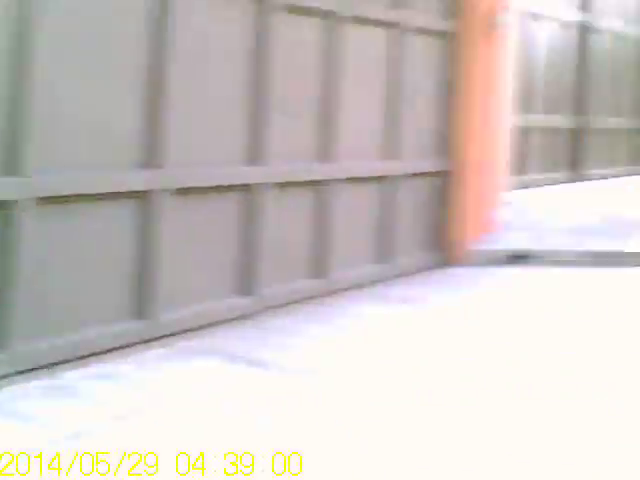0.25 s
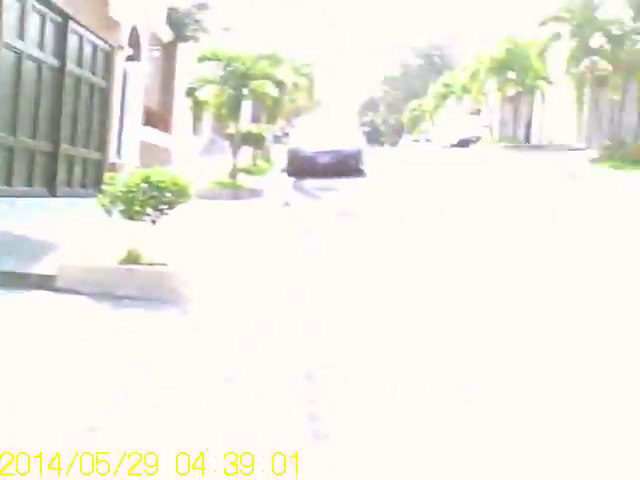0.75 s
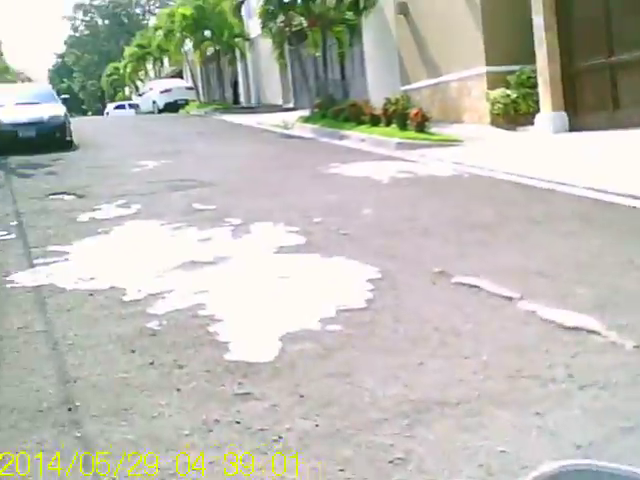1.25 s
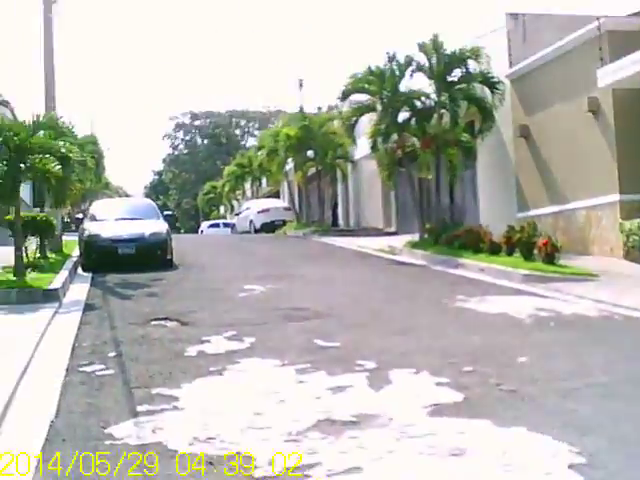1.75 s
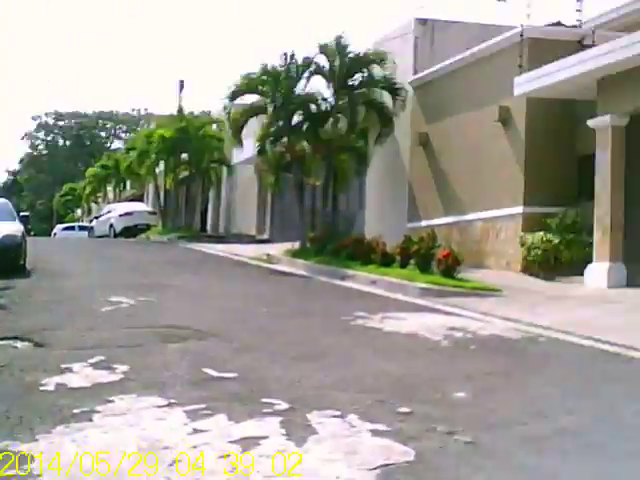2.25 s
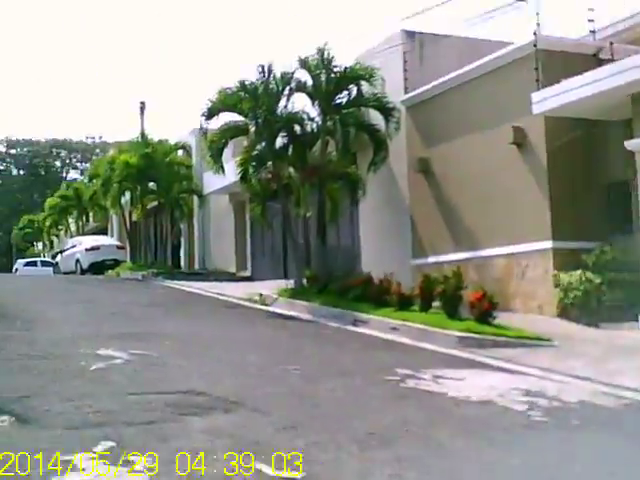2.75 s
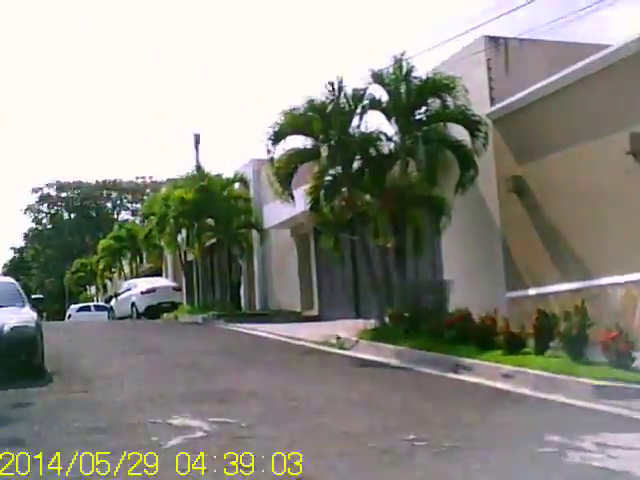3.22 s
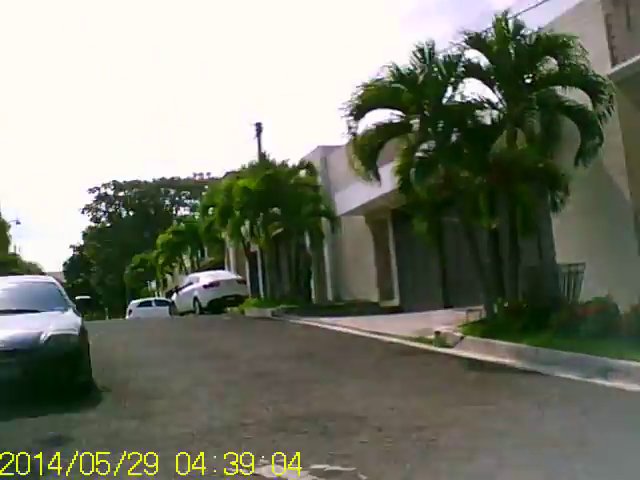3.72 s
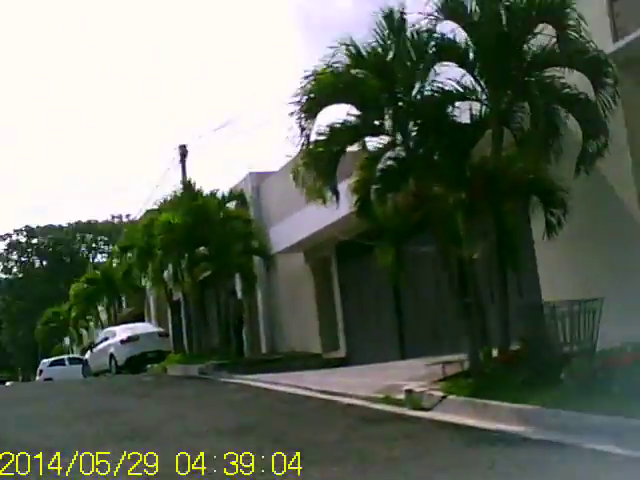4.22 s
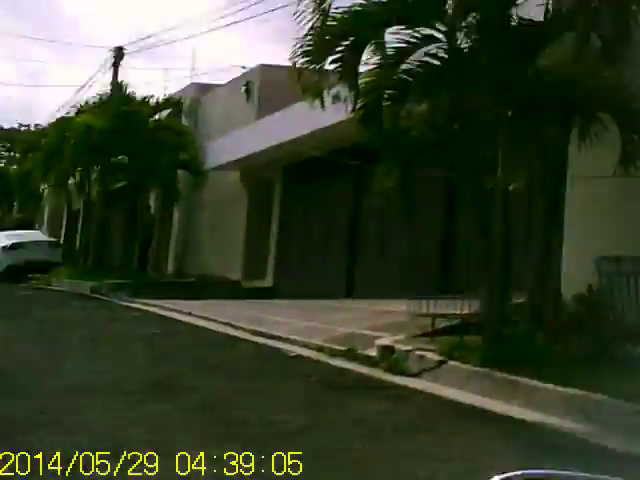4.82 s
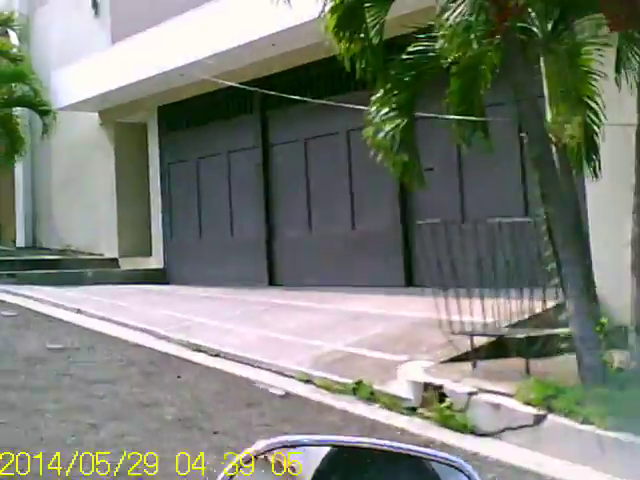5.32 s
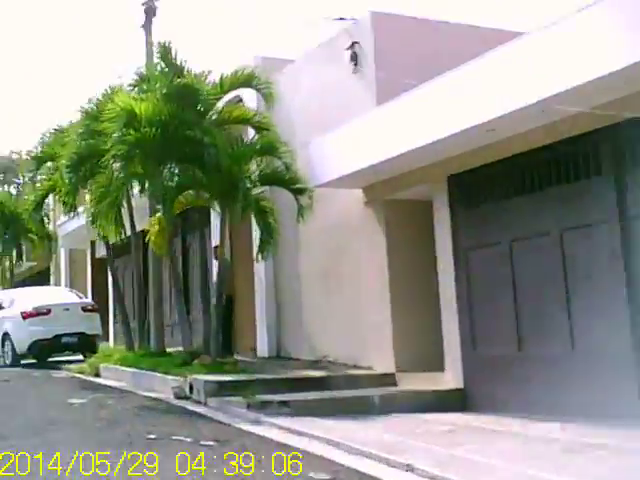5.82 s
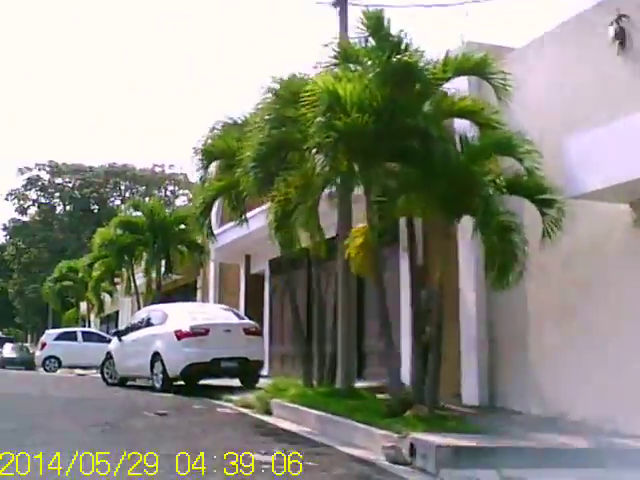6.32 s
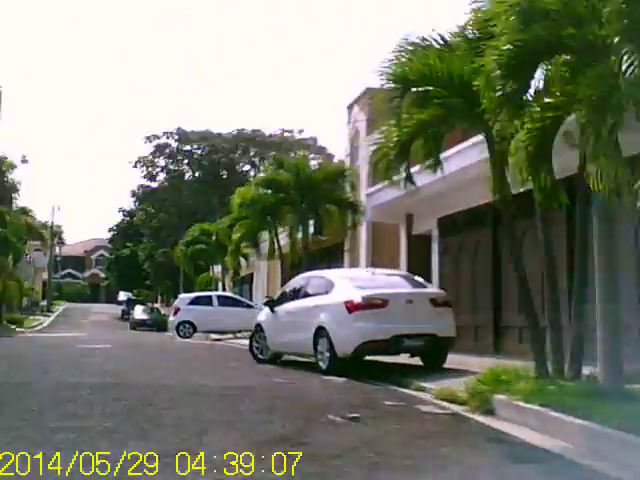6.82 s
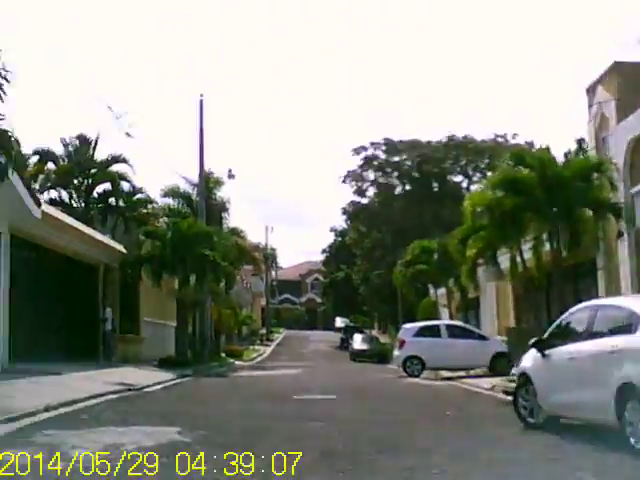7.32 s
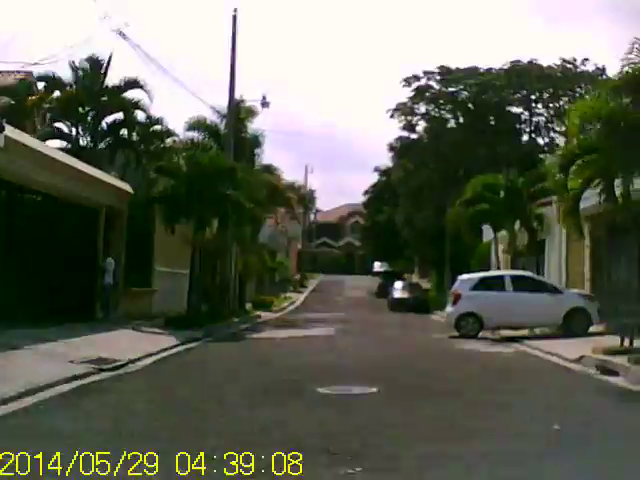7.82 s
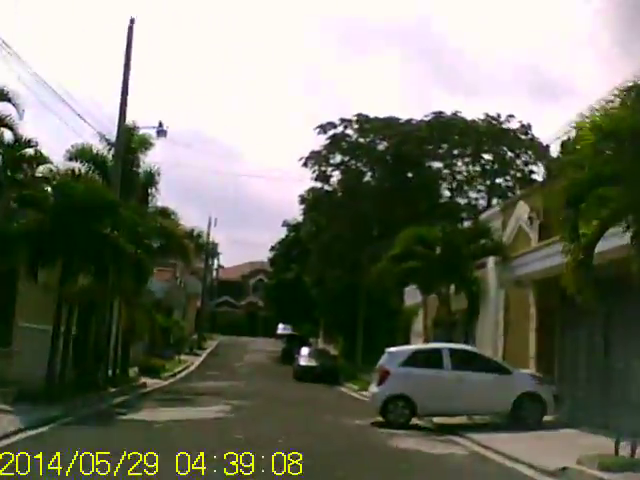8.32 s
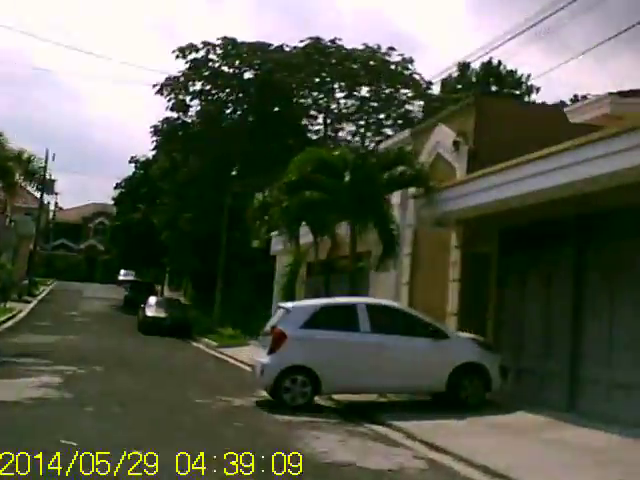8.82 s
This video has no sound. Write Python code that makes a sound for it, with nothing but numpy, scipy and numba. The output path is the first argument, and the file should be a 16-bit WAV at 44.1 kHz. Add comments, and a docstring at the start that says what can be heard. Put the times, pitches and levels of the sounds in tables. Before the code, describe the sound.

A big V-twin motorcycle heard from the saddle blips its throttle twice, sinks near idle, then pulls steadily up a street with a deep uneven throb.

```python
"""A big V-twin motorcycle from the saddle: two swells of throttle, a drop almost to idle, a long pull up a street.
Throughout, two cylinders fire in a limping pair and ring the exhaust modes; noise rasps behind each beat,
the engine knocks and ticks every cycle, and hiss and faint buffeting grow with the revs.
Loose metal chinks at the very start, fading within the first second; the rear pipe snarls on both swells;
a thin ring marks low revs. On the climb the firing stumbles, the drive snatches, and trim buzzes in short spells."""
import sys
import numpy as np
from scipy import signal
from scipy.fft import rfft, irfft, next_fast_len
from scipy.io import wavfile
from scipy.ndimage import uniform_filter1d
from numba import njit

SR = 44100
rng = np.random.default_rng(int(sys.argv[2]) if len(sys.argv) > 2 else 0)


def file_out(sig):
    """Save sig as 16-bit WAV at sys.argv[1]."""
    # one column per channel
    cols = np.atleast_2d(sig).T
    # limit, then scale
    lim = np.clip(cols, -1, 1)
    pcm = np.round(lim * 32767).astype(np.int16)
    wavfile.write(sys.argv[1], SR, pcm)


N = 399546
TIME_S = np.arange(N) / SR
CRUISE_HZ = 20  # reference speed, four-stroke cycles per second

# Engine speed. Each row: time in seconds, four-stroke cycles per second.
REVS = [(0.0, 22.18), (0.196, 24.55), (0.396, 20.49), (0.703, 24.66), (1.172, 14.94), (1.627, 10.41),
        (2.299, 11.45), (2.433, 12.17), (3.998, 15.605), (6.1, 19.27), (6.5, 19.9), (6.8, 20.745),
        (7.2, 21.877), (7.8, 23.8), (8.5, 26.285), (9.06, 27.83)]
# Drive snatch, crank ahead or behind. Each row: time in seconds, lead in cycles.
SNATCH = [(2.6, 0), (3.25, .013), (3.46, -.02), (3.56, .006), (3.86, .012), (3.98, -.018), (4.13, .02),
          (4.3, .021), (4.42, -.001), (4.74, .03), (5.3, -.004), (5.6, .015), (5.85, 0), (6.2, -.004),
          (6.45, .013), (6.75, 0)]
# Engine pull. Each row: time in seconds, load in dB around the usual for its speed.
LOAD = [(0, 1.5), (.2, -1.5), (.45, 1), (.7, -2.5), (1.08, 1.5), (1.65, 1), (2.25, 1), (2.5, 2.5), (3.2, 2),
        (3.48, 0), (3.55, 3), (3.72, 1.3), (4.05, 0), (4.35, -1.2), (4.95, 0), (5.8, -0.4), (6.3, -1),
        (6.95, 0.5), (7.72, 0.3), (7.95, 0), (8.22, 0.7), (8.55, -2.3), (9.06, -2)]
# Front cylinder's firing against the rear. Each row: time in seconds, difference in dB.
FRONT_LEAN = [(.6, 1.5), (1.3, 0.5), (2.2, -2), (3.4, 2), (3.6, 2.5), (5.5, -3.7), (6.8, -2.5), (7.5, -.5),
              (7.8, 4), (8.2, -1.5), (8.6, 2)]

# Exhaust modes, from deep to high. Each row: centre in Hz, width in Hz, relative level in dB,
# growth in dB per doubling of the revs; all as at CRUISE_HZ.
DEEP_MODES = [(108.54, 13.6, 0, 7), (126.2, 14.4, 3.5, 10), (164, 6.6, -26.5, 10), (192.4, 12.4, -11, 0)]
MIDDLE_MODES = [(235.6, 30, -3.5, 1.5), (262, 12.9, 1, 0.5), (299.2, 28, 5, 0)]
GROWL_MODES = [(362.2, 19.4, 9, -4)]
SNARL_MODES = [(448, 49, -3, -3), (479, 47, 2, 1), (527, 22, -4, 0)]
BLARE_MODES = [(488, 39, -3.5, 4), (582.4, 19, -10, -5.5), (612.8, 19.7, -10, 28), (692, 33, -13, -4.5),
               (847, 28, -10, 14.5), (1180, 48, -4, -3)]
# Gain trims of single exhaust harmonics, shaping the note. Each row: multiple of the cycle rate (rounded for pitch),
# gain in dB at CRUISE_HZ, growth in dB per doubling of the revs.
HARMONIC_TRIMS = [(2, -0.5, 8.5), (3, -3, -3.5), (4, 1.5, -3), (6, 2, 7), (7, 0, 1.7), (8, -8.5, 1.5),
                  (9, 1, 4), (10, -1, -6), (11, 3, -0.5), (12, -0.2, -4), (13.1, 4, -8), (14, -1.5, 8.1),
                  (15, 1.5, -9), (16, 1, 4.5), (20, 2.5, 1.5), (21, -2.5, 6), (22, -3.5, 2), (24, 0, 6.5),
                  (25, -4.5, -2.5)]
# Level laws. Each holds: level in dB at CRUISE_HZ and usual load, dB per doubling of the revs, dB per dB of load.
BOOM_LAW = (-20, 6.2, 1.13)
BARK_LAW = (-29.5, 17.8, 1.2)
GROWL_LAW = (-35.5, 11.1, 0.55)
RASP_LAW = (-36.5, 12.9, 0.67)
HISS_LAW = (-51, 2.5, 0.71)
# Bark beyond its law. Each row: time in seconds, extra level in dB.
BARK_EXTRA = [(0, 0), (1, 2), (1.7, 0.5), (2.5, -2), (3.2, 0), (4.2, 2), (5.1, 2), (6.2, -2.5), (7.1, 0),
              (9.06, 0)]
# Blare under throttle. Each row: time in seconds, level in dB.
BLARE_LEVEL = [(0, -39), (.18, -42), (.42, -41), (.72, -44.5), (1.2, -52.5), (2, -74), (4.5, -54),
               (5.8, -45.5), (6.5, -54.5), (7.2, -39), (8.2, -36.5), (9.06, -38.5)]
# Snarls of the rear pipe. Each row: centre in seconds, spread in seconds, peak level in dB.
SNARLS = [(.22, .09, -40.5), (.72, 0.13, -36.5)]

# Noise colours. Each row: frequency in Hz, relative level in dB.
RASP_COLOUR = [(200, 5), (400, 2.5), (560, -5), (740, -7.5), (860, 0.5), (980, -3.5), (1200, -7),
               (1450, -13), (1750, -14.5), (2100, -19.5), (2700, -25.5), (4500, -59.5), (11000, -50)]
KNOCK_COLOUR = [(300, -14.5), (600, -19), (880, -5), (1000, 4), (1350, 1.5), (1720, 9.5), (1950, -9),
                (2200, -4), (2650, -21.5), (3400, -8), (4100, -16.5), (11000, -27)]
TICK_COLOUR = [(1500, -25), (2700, -7.5), (3400, 16.5), (4100, -2.5), (4750, 10.5), (5400, 8), (7000, 7),
               (8200, 3.5), (9600, 6.5), (11500, -26.5)]
HISS_COLOUR = [(1000, 11), (2200, 5), (2700, -16), (3400, -5.5), (4000, -7), (4600, -7.5), (5600, -2),
               (7000, -6.5), (8500, -8), (9800, -7), (11500, -21)]

# Top-end clatter. Each row: time in seconds, knock level in dB, tick level in dB.
CLATTER = [(0, -60, -67), (.7, -48.5, -63.5), (1.05, -47, -58.5), (1.4, -52, -60), (1.65, -53, -61.5),
           (2.1, -50.5, -63.5), (2.8, -52, -63.5), (3.55, -49, -70), (4.3, -53, -71), (4.7, -56.5, -68),
           (5.1, -52, -60.5), (6.4, -50, -63.5), (7, -46, -61), (8.1, -48.5, -60), (9.06, -46, -58.5)]
# Single harder or softer front-piston knocks. Each row: time in seconds, extra level in dB.
HARD_KNOCKS = [(.917, 1), (1.076, 2.5), (1.206, 0), (1.273, 3.5), (1.695, -1), (1.79, 0), (2.413, 5),
               (2.577, 2.5), (2.733, 5), (2.963, 3), (3.328, 1.5), (3.537, -1.5), (3.604, 3), (3.805, 1.5),
               (5.028, 3), (5.256, 1), (5.313, 2), (5.478, 1), (5.859, 0), (6.171, 1), (6.577, 2.5),
               (7.147, 4.5), (7.284, 1.5), (8.75, -2)]
# Engine covers. Each row: centre in Hz at its loudest speed, width in Hz there, peak level in dB,
# loudest engine speed in cycles per second, spread of that speed in cycles per second.
COVERS = [(877, 18, -47, 18.3, 1.37), (1704, 49, -58.5, 14.1, 1.64), (2083, 67, -59.5, 17.94, 1.8),
          (3470, 160, -69, 15, 3.5)]
# Buzzing trim. Each row: centre in seconds, spread in seconds, pitch in Hz, peak level in dB.
RATTLES = [(3.418, .008, 7050, -61), (7.3, 0.16, 5650, -63), (7.999, .2, 6840, -65), (8.27, .05, 6850, -63),
           (8.46, .018, 5930, -57)]

# crank positions, in cycles
FIRST_TURN, REAR_LAG = -.7946, 315 / 720
FRONT_SHUT, REAR_SHUT = .18, .715  # intake valves slap shut
RATTLE_CRANK = .33

EVEN_SCATTER, STUMBLE_SCATTER = 0.31, 0.42  # firing scatter, usual and added by the stumble
STUMBLE_AT_S, STUMBLE_SPREAD_S = 3.5, 0.92
COVER_BEND = 0.43  # exponent of cover pitch on the revs
CHINK_START_DB, CHINK_FADE_DB_PER_S = -46.5, 39
ZING_DB, ZING_LIFT_DB, ZING_SPEED_HZ, ZING_SPREAD_HZ = -62.5, 4.5, 13.04, 0.42
RATTLE_WIDTH_HZ = 1100
TOP_HZ = 11200


def exhaust(turn, rate_hz):
    """Gas pulses of both cylinders, and a weaker one as the rear valve shuts, ring the pipes; gas rasps behind."""
    front, front_edge = blowdown(turn, rate_hz, 0)
    rear, rear_edge = blowdown(turn, rate_hz, REAR_LAG)
    shut, shut_edge = blowdown(turn, rate_hz, REAR_SHUT)
    note = boom_and_bark(front, rear, shut, rate_hz)
    note = note + growl(front_edge, rear_edge, shut_edge, rate_hz)
    note = note + blare(front_edge, rear_edge, shut_edge, rate_hz)
    note = note + snarl(rear_edge, rate_hz)
    return trim_harmonics(note, rate_hz) + rasp(turn, rate_hz)


def blowdown(turn, rate_hz, lag):
    """One cylinder's pulse, a push of gas then suction, both shorter at high revs; and its sharp edge."""
    dt_s, size, late = stroke(turn, rate_hz, lag)
    speed = CRUISE_HZ / rate_hz
    scatter = EVEN_SCATTER + STUMBLE_SCATTER * hump(TIME_S, STUMBLE_AT_S, STUMBLE_SPREAD_S)
    slip_s = .0008 * scatter * late
    push = 1.16 * bell(dt_s + slip_s + 0.0019, 0.0015 * speed ** 1.23)
    suction = bell(dt_s + slip_s, 0.0013 * speed ** 0.22)
    edge = -bell(dt_s + .4 * slip_s, .00028 * speed ** 1.6)
    return np.array([push - suction, edge]) * undb(2.8 * scatter * size)


def boom_and_bark(front, rear, shut, rate_hz):
    """Gas pulses ring the deep and middle modes: boom below 175 Hz, bark above."""
    lean = undb(curves(FRONT_LEAN)[0] / 2)
    heat = (rate_hz / CRUISE_HZ) ** 0.18  # hotter gas raises the deep modes
    flow = (rate_hz / CRUISE_HZ) ** 1.12  # faster gas damps the modes
    pipe = modes(front * lean + rear / lean, DEEP_MODES, rate_hz, heat, flow)
    pipe = pipe + modes(front + rear + 0.27 * shut, MIDDLE_MODES, rate_hz, damping=flow)
    boom = lowpass(pipe, 175)
    bark = steady(pipe - boom) * undb(curves(BARK_EXTRA)[0])
    thinning = 0.24 * np.clip((rate_hz - 20) / 5, -1, 1)  # lowest throb thins as the revs climb
    boom = boom - thinning * lowpass(boom, 86)
    return steady(boom) * loudness(BOOM_LAW, rate_hz) + bark * loudness(BARK_LAW, rate_hz)


def growl(front_edge, rear_edge, shut_edge, rate_hz):
    """Pulse edges ring the growling mode, kept to 290-470 Hz; the front one's share grows with the revs."""
    edges = 0.64 * (rate_hz / CRUISE_HZ) ** 1.5 * front_edge + rear_edge + 0.24 * shut_edge
    x = modes(edges, GROWL_MODES, rate_hz, warmth(rate_hz))
    x = lowpass(x - lowpass(x, 290), 470)
    return steady(x) * loudness(GROWL_LAW, rate_hz)


def blare(front_edge, rear_edge, shut_edge, rate_hz):
    """Pulse edges ring the upper modes, kept to 420-1500 Hz."""
    edges = front_edge + 0.9 * rear_edge + .3 * shut_edge
    x = modes(edges, BLARE_MODES, rate_hz, warmth(rate_hz))
    x = lowpass(x - lowpass(x, 420), 1500)
    return steady(x) * undb(curves(BLARE_LEVEL)[0])


def warmth(rate_hz):
    """Slight rise of mode pitch with the revs."""
    return (rate_hz / 22) ** 0.022


def snarl(rear_edge, rate_hz):
    """Rear pulse edges ring the snarl modes in brief swells."""
    x = steady(resonance(modes(rear_edge, SNARL_MODES, rate_hz), 380, 150))
    return x * sum(undb(db) * hump(TIME_S, at_s, spread_s) for at_s, spread_s, db in SNARLS)


def trim_harmonics(x, rate_hz):
    """Trim the gain around single harmonics with band-passes that follow the revs."""
    doublings = np.log2(rate_hz / CRUISE_HZ)
    out = x
    for order, db, doubling_db in HARMONIC_TRIMS:
        gain = undb(db + doubling_db * doublings)
        out = out + (gain - 1) * svf(x, round(order) * rate_hz, np.full(N, 0.23 / order))
    return out


def rasp(turn, rate_hz):
    """Turbulent gas: noise puffed by each beat, plus dense silencer reflections."""
    puffs = burst(turn, rate_hz, -0.012, rise_s=0.0041, fall_s=0.073, scatter_db=-3.5)
    puffs = puffs + 0.99 * burst(turn, rate_hz, REAR_LAG, rise_s=0.024, fall_s=0.03, scatter_db=1.0)
    puffs = puffs + 1.2 * (rate_hz / CRUISE_HZ) ** 2  # a steady rush fills in between beats, growing with the revs
    gas = steady(noise(RASP_COLOUR) * puffs * undb(3.0 * walk(220)))
    ring = echoes(turn, rate_hz, -0.0306, RASP_COLOUR, fall_s=0.058)
    ring = steady(ring + echoes(turn, rate_hz, .41, RASP_COLOUR, fall_s=0.027))
    return steady(gas + .7 * ring * rate_hz / 22) * loudness(RASP_LAW, rate_hz)


def echoes(turn, rate_hz, lag, colour, fall_s):
    """Dense silencer reflections: the same dying noise pattern follows every beat of a cylinder."""
    age_s = (turn - lag) % 1 / rate_hz
    swell = np.minimum(age_s / .004, 1)
    return np.interp(age_s, TIME_S, noise(colour)) * np.exp(-age_s / fall_s) * swell


def top_end(turn, rate_hz):
    """Pistons and valve gear: noise bursts, a knock and tick a cycle, spreading into chatter at high revs."""
    knock_db, tick_db = curves(CLATTER)
    grit = undb(2.2 * walk(800))
    scatter_db = 1.5
    busy = (rate_hz / CRUISE_HZ) ** 3.0
    seating = burst(turn, rate_hz, FRONT_SHUT, rise_s=0.0013, fall_s=0.0052, scatter_db=scatter_db)
    seating = seating + burst(turn, rate_hz, REAR_SHUT - .04, rise_s=0.0015, fall_s=0.0054, scatter_db=scatter_db)
    seating = busy * seating

    knocks = burst(turn, rate_hz, -0.024, rise_s=0.0021, fall_s=0.0047, scatter_db=scatter_db) + 0.23 * seating
    rear = burst(turn, rate_hz, REAR_LAG, rise_s=0.0027, fall_s=0.0057, scatter_db=scatter_db)
    knocks = knocks + (0.44 + 0.14 * busy) * rear
    knock = steady(noise(KNOCK_COLOUR) * knocks * grit) * undb(knock_db + hard_knocks_db())

    # dull and bright halves of each tick vary on their own; the bright comes a little later
    metal = noise(TICK_COLOUR) * grit
    dull = lowpass(metal, 5500)
    bright = metal - dull
    tick = dull * burst(turn, rate_hz, -0.021, rise_s=0.0016, fall_s=0.0029, scatter_db=scatter_db)
    tick = tick + 0.59 * bright * burst(turn, rate_hz, -.005, rise_s=0.0016, fall_s=.007, scatter_db=2 * scatter_db)
    rear = burst(turn, rate_hz, REAR_LAG, rise_s=0.00085, fall_s=0.0028, scatter_db=scatter_db)
    tick = tick + metal * (0.42 * rear + 0.13 * seating)
    return knock + steady(tick) * undb(tick_db)


def hard_knocks_db():
    """Extra dB of the single harder or softer knocks."""
    return sum(db * hump(TIME_S, at_s, .012) for at_s, db in HARD_KNOCKS)


def covers(turn, rate_hz):
    """Front knocks ring the metal covers, each loudest at its own engine speed and rising with the revs."""
    dt_s, size, _ = stroke(turn, rate_hz, -0.0422)
    blows = steady(bell(dt_s, .00005) * undb(1.5 * size))
    rough = burst(turn, rate_hz, 0, rise_s=.002, fall_s=.008, scatter_db=1.5) * rng.standard_normal(N)
    blows = blows + .45 * steady(rough)
    out = 0
    for hz, width_hz, db, speed_hz, spread_hz in COVERS:
        bend = np.clip((rate_hz / speed_hz) ** COVER_BEND, .97, 1.05)
        ring = steady(resonance(resonance(blows, hz, width_hz, bend), hz, 500))
        out = out + ring * undb(db) * hump(rate_hz, speed_hz, spread_hz)
    return out * undb(hard_knocks_db())


def loose_metal(turn, rate_hz):
    """Resonant noise: a chink once a cycle, fading within the first second, and a thin ring strongest at low revs."""
    shake = .18 + .75 * burst(turn, rate_hz, .365, rise_s=.002, fall_s=.006, scatter_db=1.2)
    chink = steady(resonance(resonance(rng.standard_normal(N), 5550, 700), 6000, 900)) * shake
    zing = steady(resonance(resonance(rng.standard_normal(N), 3445, 440), 3000, 740)) * undb(2.25 * walk(45))
    chink_db = CHINK_START_DB - CHINK_FADE_DB_PER_S * TIME_S
    zing_db = ZING_DB + ZING_LIFT_DB * hump(rate_hz, ZING_SPEED_HZ, ZING_SPREAD_HZ)
    return chink * undb(chink_db) + zing * undb(zing_db)


def rattles(turn, rate_hz):
    """Loose trim, resonant noise shaken once a cycle, buzzes in short spells, each at its own pitch."""
    shake = 0.27 + burst(turn, rate_hz, RATTLE_CRANK, rise_s=.002, fall_s=0.01, scatter_db=3.0)
    shake = shake * undb(3 * walk(600))
    out = 0
    for at_s, spread_s, hz, db in RATTLES:
        ring = resonance(resonance(rng.standard_normal(N) * shake, hz, RATTLE_WIDTH_HZ), hz, 1500)
        out = out + ring / ring.std() * undb(db) * hump(TIME_S, at_s, spread_s)
    return out


def air(rate_hz):
    """Coloured noise: hiss growing with revs and load, and faint low buffeting on the microphone."""
    hiss = noise(HISS_COLOUR) * loudness(HISS_LAW, rate_hz) * undb(.5 * walk(25) + 1.3 * walk(7.3))
    buffet = noise([(3, 2), (25, 0), (60, -3), (150, -8), (400, -22), (2000, -70)])
    return hiss + buffet * undb(-47 + 9 * np.log2(rate_hz / CRUISE_HZ) + 2 * walk(4))


def stroke(turn, rate_hz, lag):
    """Seconds from the nearest passing of a crank position, and two chance values held for that cycle."""
    cycle = np.round(turn - lag)
    chance = rng.standard_normal((256, 2))[cycle.astype(int) + 2]
    return (turn - lag - cycle) / rate_hz, chance[:, 0], chance[:, 1]


def burst(turn, rate_hz, lag, rise_s, fall_s, scatter_db):
    """Envelope that swells and dies once a cycle, each time with its own strength."""
    dt_s, size, _ = stroke(turn, rate_hz, lag)
    return np.exp(-np.abs(dt_s) / np.where(dt_s < 0, rise_s, fall_s)) * undb(scatter_db * size)


def modes(x, table, rate_hz, stretch=1, damping=1):
    """Ring a table of modes, each growing in its own way with the revs."""
    doublings = np.log2(rate_hz / CRUISE_HZ)
    return sum(undb(db + doubling_db * doublings) * resonance(x, hz, width_hz, stretch, damping)
               for hz, width_hz, db, doubling_db in table)


def resonance(x, hz, width_hz, stretch=1, damping=1):
    """One resonance, its pitch scaled by stretch and its losses by damping."""
    return svf(x, hz * stretch * np.ones(N), width_hz / hz * damping * np.ones(N))


@njit
def svf(x, hz, k):
    """State-variable band-pass with a moving centre and relative width k."""
    y, b, l = np.empty(len(x)), 0., 0.
    for i in range(len(x)):
        g = np.tan(np.pi * hz[i] / SR)
        v = (b + g * (x[i] + 1e-18 - l)) / (1 + g * (g + k[i]))
        b, l, y[i] = 2 * v - b, l + 2 * g * v, k[i] * v
    return y


def loudness(law, rate_hz):
    """Gain of a layer that follows the revs and the load."""
    cruise_db, doubling_db, load_share = law
    load_db, = curves(LOAD)
    return undb(cruise_db + doubling_db * np.log2(rate_hz / CRUISE_HZ) + load_share * load_db)


def steady(x):
    """Scale to a running rms of 1, keeping the single beats."""
    size = SR // 7
    power = uniform_filter1d(uniform_filter1d(x * x, size), size)
    return x / np.sqrt(power + 1e-14)


def lowpass(x, hz):
    """The part of a sound below hz, with no delay."""
    return signal.sosfiltfilt(signal.butter(4, hz, fs=SR, output="sos"), x)


def noise(colour):
    """Noise of rms 1 with a (Hz, dB) colour."""
    hz, db = np.transpose(colour)
    size = next_fast_len(N)
    f = np.maximum(np.arange(size // 2 + 1) * SR / size, 1)
    gain = undb(np.interp(np.log(f), np.log(hz), db))
    x = irfft(rfft(rng.standard_normal(size)) * gain, size)[:N]
    return x / x.std()


def walk(steps_per_s):
    """Random wander between normal draws, with a spread near 1."""
    steps = rng.standard_normal(8192)
    return np.interp(TIME_S * steps_per_s, np.arange(len(steps)), steps)


def curves(table):
    """The columns of a table at every sample."""
    s, *columns = np.transpose(table)
    return [np.interp(TIME_S, s, c) for c in columns]


def bell(t_s, width_s):
    """Smooth pulse of fixed area."""
    return np.exp(-.5 * (t_s / width_s) ** 2) / width_s


def hump(x, centre, spread):
    """Smooth rise to 1 around a centre."""
    return np.exp(-.5 * ((x - centre) / spread) ** 2)


def undb(db):
    """Decibels to gain."""
    return np.exp(np.asarray(db) * (np.log(10) / 20))


def scene():
    """Crank angle times every part of the engine."""
    rate_hz, = curves(REVS)
    turn = FIRST_TURN + np.cumsum(rate_hz) / SR + curves(SNATCH)[0]
    engine = exhaust(turn, rate_hz) + top_end(turn, rate_hz) + covers(turn, rate_hz)
    trim = loose_metal(turn, rate_hz) + rattles(turn, rate_hz)
    return (engine + trim + air(rate_hz))[None]


def record(dry):
    """A small camera cuts the treble steeply above TOP_HZ."""
    return signal.sosfilt(signal.ellip(8, .2, 80, TOP_HZ, fs=SR, output="sos"), dry)


dry = scene()
out = record(dry)
file_out(out)
```